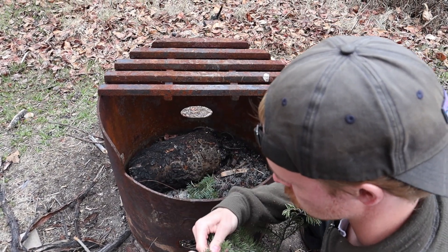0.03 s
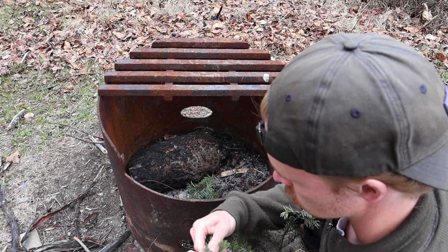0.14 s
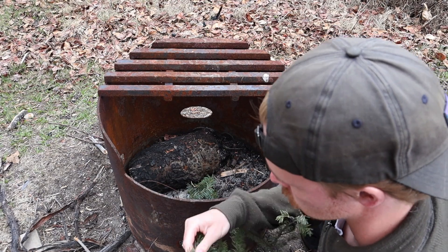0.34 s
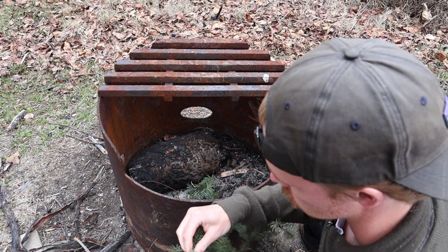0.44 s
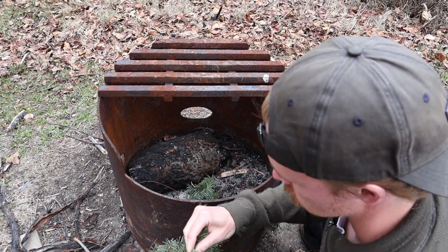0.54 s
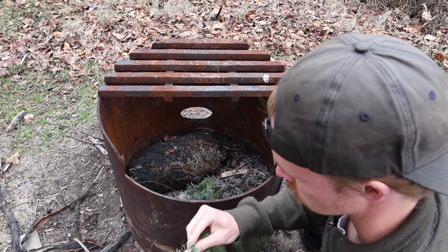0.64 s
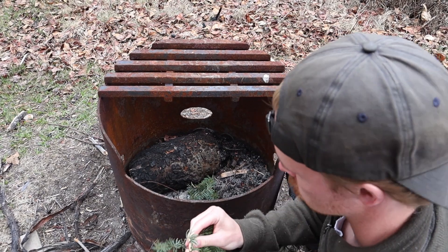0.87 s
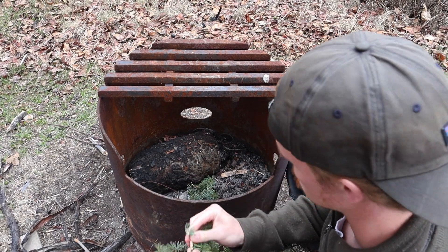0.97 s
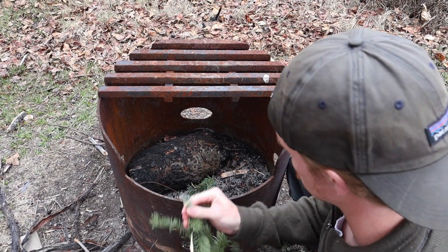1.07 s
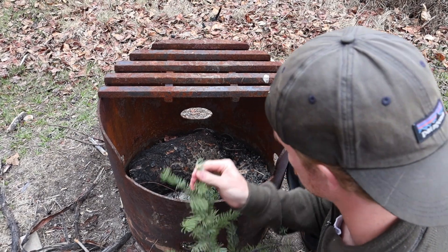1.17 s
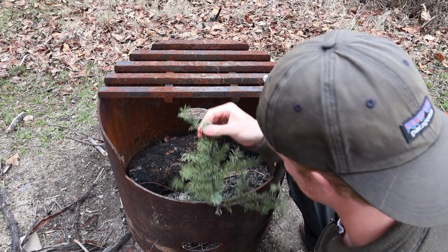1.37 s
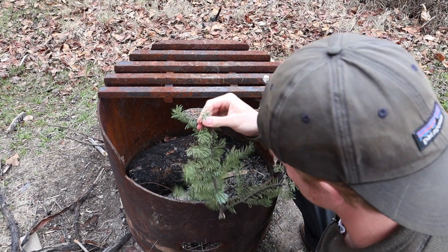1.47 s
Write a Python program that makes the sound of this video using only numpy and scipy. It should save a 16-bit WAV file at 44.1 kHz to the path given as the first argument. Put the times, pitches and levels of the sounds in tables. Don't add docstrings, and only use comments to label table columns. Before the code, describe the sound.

Hands break thin conifer twigs close to a small camera microphone outdoors: two crisp snaps in quick succession, a dull stick knock, scattered ticks, then a short swish of needles over faint distant hum.

```python
import sys
import numpy as np
from scipy import signal
from scipy.fft import rfft, irfft
from scipy.io import wavfile
from scipy.ndimage import uniform_filter1d

SR = 44100
rng = np.random.default_rng(int(sys.argv[2]) if len(sys.argv) > 2 else 0)


def makeup_ratio(level_db):
    decades = np.asarray(level_db, float) / 20
    return 10 ** decades


def unload_audio(sound):
    columns = np.transpose(np.atleast_2d(sound))
    steps = np.round(np.clip(columns, -1, 1) * 32767)
    wavfile.write(sys.argv[1], SR, steps.astype(np.int16))


N = 68355

# pitch_hz, density_db (per Hz)
AIR_COLOUR = [(12, 5), (20, -2), (523, -6.5), (601, -6), (772, -5.5), (1780, -12), (3290, -17.5),
              (3580, -18), (15700, -29.5)]
# centre_s, peak_db, pitch_hz, length_s
WIND_BUMPS = [
    (0.038, -43.5, 112, 0.0085),
    (0.091, -53.5, 45, 0.019),
    (0.754, -38.5, 75, 0.012),
    (0.814, -52, 88, 0.038),
    (0.961, -48.5, 38, 0.046),
    (1.205, -49, 69.5, 0.015),
    (1.501, -51, 81, 0.027),
]
# time_s, effort_db, dullness_db
RUSTLE_EFFORT = [(0, -63, 5), (.4, -59, 3.5), (.58, -62, -1), (.7, -61, 10.5), (.72, -52, 1.5),
                 (.79, -51, 3), (.88, -56, 6), (.94, -57.5, 5), (1.01, -60.5, -6), (1.032, -48, -16),
                 (1.055, -47, 4), (1.076, -40.5, -2.5), (1.169, -40.5, 0.5), (1.185, -49, 0),
                 (1.22, -53, 4), (1.27, -56, 9), (1.31, -63, 0), (1.55, -58, 4)]
# pitch_hz, density_db (per Hz)
NEEDLE_COLOUR = [(800, -7), (2200, -2), (4000, 1.5), (4700, -14), (5500, 1), (7000, 1.5), (10200, 3),
                 (16000, -7.5)]
# centre_s, level_db, pitch_hz, length_s
BARK_SCRAPES = [(1.284, -40, 2800, .005), (1.2925, -36.5, 3550, .004), (1.256, -50, 3000, .004),
                (1.288, -47, 5400, .007), (1.288, -54, 8500, .007), (1.289, -43, 2000, .008),
                (1.27, -51, 3300, .01), (1.264, -46, 3000, .003), (1.245, -53, 3200, .012),
                (.788, -53, 3600, .008), (.75, -48, 3300, .005)]
# start_s, end_s, from_hz, to_hz, level_db, late_swell (exponent)
BARK_SQUEAKS = [
    (.829, .856, 2900, 5600, -52, 1),
    (1.2835, 1.2894, 2800, 3800, -25, 4),
]
# pitch_hz, density_db (per Hz)
KNOCK_COLOUR = [(250, -22), (420, -3), (700, 0), (1200, -5), (2500, -7), (3300, -18), (6000, -35)]
# start_s, peak_db, pitch_hz, width_hz
WOODY_TAPS = [(1.4984, -34, 2820, 130), (1.4986, -36, 4400, 140), (1.5026, -33, 3320, 200),
              (1.5028, -44, 10600, 500), (1.546, -38, 4000, 500), (.3454, -31, 2500, 500),
              (.3456, -36, 1600, 400), (.3815, -41, 2600, 900), (.0555, -43, 2500, 900),
              (.1976, -23, 1120, 200), (.1977, -29, 660, 180), (.1976, -30, 1550, 300),
              (.2012, -31, 1500, 500), (.2284, -32, 1090, 250), (.2282, -38, 600, 250),
              (.1975, -36, 860, 250), (1.4985, -42, 1900, 600), (1.4987, -42, 5500, 600),
              (1.5028, -41, 4000, 500), (.2283, -31, 1500, 500)]
# start_s, peak_db, bright_ring_hz, wood_share_db
SMALL_TICKS = [(0.0314, -48, 11800, -9), (0.0446, -38.5, 10800, -1), (0.057, -46, 11400, -6),
               (0.0874, -46, 10500, -8), (0.1246, -38.5, 10500, 0), (0.1316, -36, 10400, 1),
               (0.1355, -43, 9180, -1), (0.155, -38.5, 10300, 4), (0.3453, -39, 9700, -7),
               (0.4033, -29.5, 7860, 3), (0.5833, -40, 11100, 10), (0.589, -38.5, 8810, 12),
               (0.5914, -46, 9530, -7), (0.6795, -31, 9800, -4), (0.7172, -38, 10600, 6),
               (0.732, -38, 11500, 0), (0.7478, -33.5, 9900, 17), (0.758, -44, 9200, 5),
               (0.796, -38, 9500, -11), (0.8211, -29, 8600, -4), (0.8638, -28.5, 10200, 7),
               (1.015, -38, 9200, -16), (1.0256, -27, 9540, -1.5), (1.062, -28, 9400, -16),
               (1.0828, -31, 9500, -10), (1.1333, -42, 11300, 3), (1.1663, -30, 9700, -14),
               (1.4031, -38.5, 10700, -2), (1.439, -39, 11200, 0), (1.5316, -39, 11500, 4),
               (.7195, -42, 10800, -2), (.7345, -32, 8950, 15), (.7498, -41, 9500, 9), (.754, -41, 7960, 2),
               (.852, -45, 10500, -2), (.87, -45, 12000, 5), (1.0355, -35, 8800, 10),
               (1.1365, -25, 11000, -3), (1.146, -41, 11500, -7), (1.097, -43, 12700, -6)]
# pitch_hz, width_hz, level_db
BARK_RINGS = [(2200, 600, -10), (3600, 900, -7), (5600, 600, -1)]
# start_s, peak_db, bright_ring_hz, wood_share_db
SNAP_FIBRES = [(.1973, -2.5, 10400, -2), (.1977, -10, 10300, -14), (.1991, -17, 13000, -3),
               (.2017, -27, 10500, 6), (.2022, -24, 10700, -6), (.2065, -33, 10500, -6),
               (.2160, -24, 10300, -6), (.2222, -33, 9500, 4), (.2248, -24, 9600, -8),
               (.2262, -9, 10000, -9), (.2281, -3.5, 10200, -3), (.2291, -14, 8500, 2),
               (.2298, -20, 11500, 4), (.2308, -25, 9000, -4), (.2330, -24, 11000, 0),
               (.5631, -21.5, 9600, -12), (.5711, -32, 11000, -6), (.6191, -29, 10300, 0),
               (1.1139, -23, 9500, -10), (1.1165, -16, 11000, -9), (.1986, -21, 13800, 10),
               (.2008, -28, 9000, 12), (.2040, -32, 11000, 8), (.2289, -19, 9000, 14),
               (.2319, -27, 8000, 8), (.2345, -30, 8000, 8), (.2372, -36, 10800, 6),
               (.2450, -40, 10000, -6)]
# pitch_hz, width_hz, level_db
WOOD_RINGS = [(2050, 440, 0.5), (3860, 820, 2), (5675, 650, 1), (7200, 900, -4)]
# pitch_hz, side_below_mid_db
CHANNEL_DIFFERENCE = [(60, -62), (180, -32), (550, -34), (1650, -38), (4970, -34), (15000, -42)]


def evened(x):
    return x / np.sqrt(np.mean(x ** 2) + 1e-20)


def add(mix, start_s, sound):
    part = mix[round(start_s * SR):][:len(sound)]
    part += sound[:len(part)]


def resonate(x, hz, width_hz):
    r = np.exp(-np.pi * width_hz / SR)
    w = 2 * np.pi * min(hz, 17000) / SR
    return signal.lfilter([0, np.sin(w)], [1, -2 * r * np.cos(w), r * r], x)


def coloured(x, colour):
    hz, db = np.transpose(colour)
    bins_hz = np.fft.rfftfreq(len(x), 1 / SR)
    gain_db = np.interp(np.log(bins_hz + 1), np.log(hz + 1), db)
    return irfft(rfft(x) * makeup_ratio(gain_db), len(x))


def high_pass(x, hz, order):
    return signal.sosfilt(signal.butter(order, hz, "high", fs=SR, output="sos"), x)


def band_limit(x, edge_hz, size):
    return signal.oaconvolve(x, signal.firwin(size, edge_hz, window=("kaiser", 8), fs=SR), "same")


def outdoors():
    swell = makeup_ratio(1.38 * evened(uniform_filter1d(rng.standard_normal(N), size=3000)))
    return makeup_ratio(-51) * evened(coloured(rng.standard_normal(N), AIR_COLOUR)) * swell


def wind_bumps():
    out, t = np.zeros(N), np.arange(N) / SR
    for centre_s, db, hz, length_s in WIND_BUMPS:
        swing = np.cos(2 * np.pi * hz * (t - centre_s))
        out += makeup_ratio(db) * np.exp(-((t - centre_s) / length_s) ** 2) * swing
    return out


def rustle():
    t = np.arange(N) / SR
    time_s, effort_db, dull_db = np.transpose(RUSTLE_EFFORT)
    grains_per_s, spread_db = 9000, 2.8
    size = makeup_ratio(spread_db * np.minimum(rng.exponential(1, N), 4))
    grains = size * (rng.random(N) < grains_per_s / SR) * rng.choice([-1., 1.], N)
    clumps = makeup_ratio(1.5 * evened(uniform_filter1d(rng.standard_normal(N), size=180)))
    needles = evened(coloured((grains + 0.52 * rng.standard_normal(N)) * clumps, NEEDLE_COLOUR))
    needles += makeup_ratio(-10) * evened(resonate(needles, 5550, 600))
    dull = signal.sosfilt(signal.butter(2, 4500, fs=SR, output="sos"), needles)
    bright = needles - dull
    return makeup_ratio(np.interp(t, time_s, effort_db)) * (bright + makeup_ratio(np.interp(t, time_s, dull_db)) * dull)


def scrapes():
    out, t = np.zeros(N), np.arange(N) / SR
    for centre_s, db, hz, length_s in BARK_SCRAPES:
        slip = rng.standard_normal(N) ** 3
        tone = resonate(resonate(slip, hz, 800), hz, 1300)
        below = resonate(resonate(slip, .63 * hz, 700), .63 * hz, 900) / 5
        above = .5 * resonate(slip, 1.6 * hz, 1200) + .15 * resonate(slip, 2.1 * hz, 2000)
        around = below + np.diff(above, prepend=0)
        swell = np.exp(-abs((t - centre_s) / length_s) ** 3)
        out += makeup_ratio(db) * (evened(tone) + .6 * evened(around)) * swell
    return out


def squeaks():
    out, t = np.zeros(N), np.arange(N) / SR
    for start_s, end_s, from_hz, to_hz, db, late in BARK_SQUEAKS:
        u = np.clip((t - start_s) / (end_s - start_s), 0, 1)
        swell = abs(np.sin(np.pi * u ** late)) ** .7
        turns = np.cumsum(from_hz + (to_hz - from_hz) * u) / SR
        out += makeup_ratio(db) * swell * np.sin(2 * np.pi * turns)
    return out


def knock():
    out, t = np.zeros(N), np.arange(4000) / SR
    start_s, level_db, t60_s = .3455, -41, .055
    burst = evened(coloured(rng.standard_normal(len(t)), KNOCK_COLOUR))
    add(out, start_s, makeup_ratio(level_db - 60 * t / t60_s) * burst)
    return out


def taps():
    out, click = np.zeros(N), np.eye(1, 1200)[0]
    for start_s, db, hz, width_hz in WOODY_TAPS:
        add(out, start_s, makeup_ratio(db) * resonate(click, hz, width_hz))
    return out


def specks():
    out, specks_per_s, level_db = np.zeros(N), 41, -50
    for ring_hz in (8500, 10300, 11800):
        hits = rng.random(N) < specks_per_s / 3 / SR
        flicks = hits * makeup_ratio(level_db + 3 * rng.standard_normal(N))
        out += resonate(flicks, ring_hz, 1100)
    return out


def crack(db, ring_hz, wood_db, chance, body, smear_s, air_db):
    t = np.arange(len(chance)) / SR
    echo_db, echo_t60_s = -28, .022
    scatter = makeup_ratio(echo_db - 60 * t / echo_t60_s) * (t > .0005)
    tick = chance * (np.exp(-t / smear_s) + scatter)
    tick[[0, 2]] = -.4, 1
    wood = np.zeros(len(t))
    for k, (hz, width_hz, level_db) in enumerate(body):
        sign = (-1) ** ((k + 1) // 2)
        wood += sign * makeup_ratio(level_db) * resonate(tick, hz, width_hz)
    bright = resonate(tick, ring_hz, 900) - makeup_ratio(air_db) * resonate(tick, 15200, 2000)
    sound = makeup_ratio(wood_db) * .5 * wood - bright
    return makeup_ratio(db) * sound / abs(sound).max()


def cracks(rows, lag_s, body, smear_s, air_db):
    out = np.zeros(N)
    chances = rng.standard_normal((len(rows), 900)) ** 3 / 4
    for (start_s, *row), chance in zip(rows, chances):
        add(out, start_s + lag_s, crack(*row, chance, body, smear_s, air_db))
    return out


def ticks():
    return cracks(SMALL_TICKS, .00046, BARK_RINGS, smear_s=.0012, air_db=-11)


def snaps():
    return cracks(SNAP_FIBRES, -.0001, WOOD_RINGS, smear_s=2e-5, air_db=-6)


def scene():
    bass_cut_hz = 450
    snapping = makeup_ratio(-1) * high_pass(snaps(), bass_cut_hz, order=2)
    small = high_pass(ticks() + taps() + specks(), bass_cut_hz, order=2)
    slips = high_pass(scrapes() + squeaks(), 1500, order=4)
    steady = small + rustle() + slips + knock() + outdoors() + wind_bumps()
    mid = band_limit(snapping, 16550, size=101) + band_limit(steady, 15850, size=601)
    side = coloured(np.roll(mid, 40), CHANNEL_DIFFERENCE)
    return np.array([mid + side, mid - side])


def top_cut(x):
    return signal.sosfilt(signal.butter(12, 17490, fs=SR, output="sos"), x)


def record(dry):
    return top_cut(dry)


dry = scene()
out = record(dry)
unload_audio(out)
```